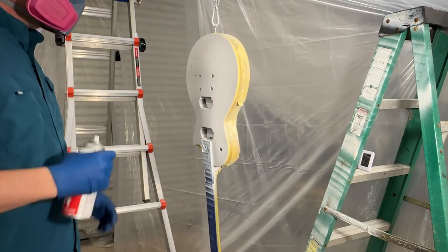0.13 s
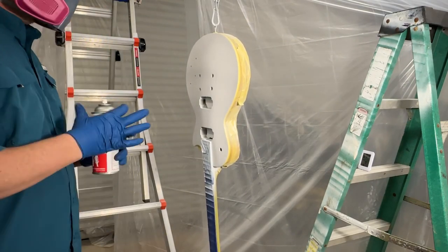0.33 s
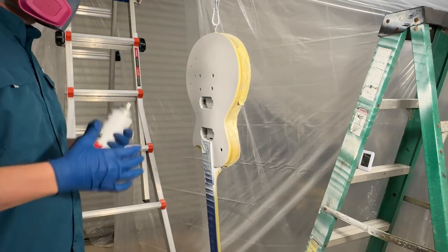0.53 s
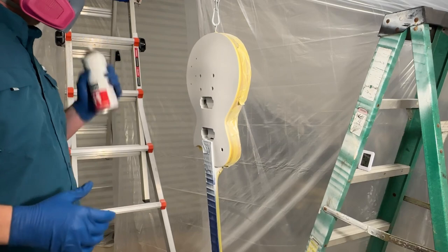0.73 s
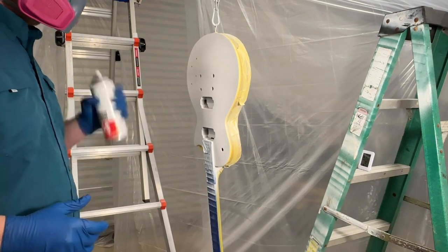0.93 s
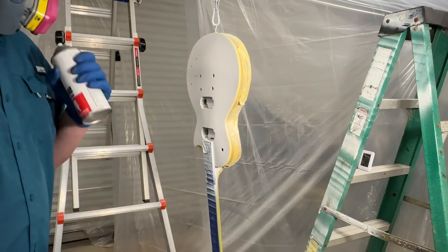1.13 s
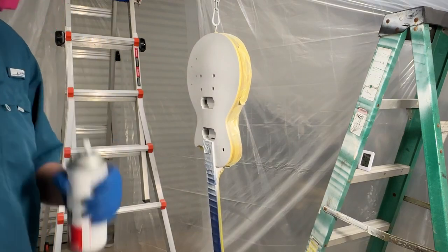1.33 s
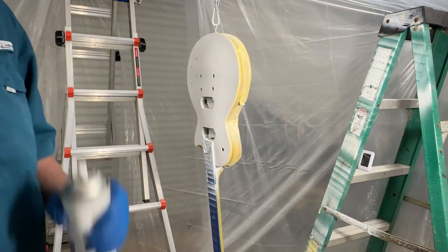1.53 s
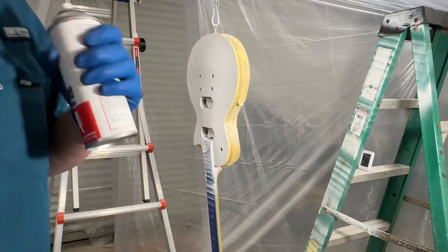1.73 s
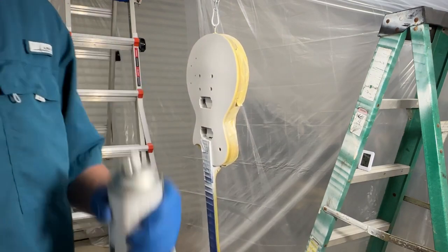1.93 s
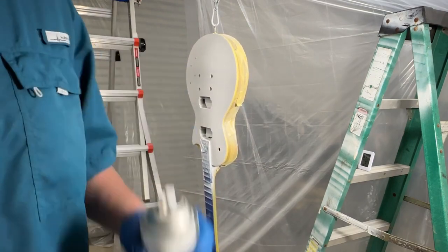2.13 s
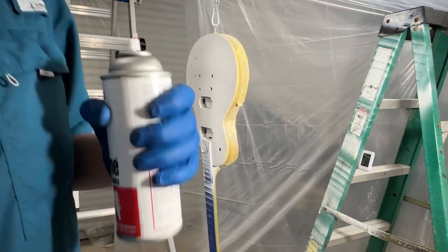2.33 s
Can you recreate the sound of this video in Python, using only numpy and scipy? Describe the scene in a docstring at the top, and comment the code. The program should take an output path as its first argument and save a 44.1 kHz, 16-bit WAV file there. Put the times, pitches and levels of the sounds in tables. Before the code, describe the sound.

Mixing ball clacks and chinks inside a hand-held spray can, faltering at first, then striking briskly about seven or eight times a second, growing louder and drier near the stereo microphone, over soft rumble and hiss.

```python
"""A small workshop: a gloved hand shakes a spray paint can, for the most part about three times a second.
At each turn of the stroke the mixing ball strikes one end and bounces: a shaped noise crack, filtered by
the steel. In between it taps the side wall and tumbles, and the paint swishes as dense random grains.
Hand and sleeve add soft brushes and one short low thump, as bands of noise. The room answers with echoes
and a decaying tail, which weaken as the can nears the microphone. A wavering low hum, rumble and hiss
lie beneath."""
import sys
import numpy as np
from scipy import signal
from scipy.fft import rfft, irfft
from scipy.io import wavfile
from scipy.ndimage import uniform_filter1d

SR = 44100
rng = np.random.default_rng(int(sys.argv[2]) if len(sys.argv) > 2 else 0)


def generate_wav(sig):
    """Save sig (samples, or channels by samples) to the path in sys.argv[1] as 16-bit PCM at SR."""
    pcm = np.round(np.clip(np.atleast_2d(sig).T, -1, 1) * 32767).astype(np.int16)
    wavfile.write(sys.argv[1], SR, pcm)


N = 109676

# Ball striking the ends. Each row: start in seconds, relative level in dB, place from 0 (clacking end)
# to 1 (chinking end), top fizz in dB, low knock in dB, most excited shell resonance in Hz.
END_STRIKES = [(-0.012, -0.5, 0.22, 6, 3.5, 5000), (0.1292, -7, 0.32, 7, 8.5, 1304),
               (0.1434, -9, 1, 0.5, -35, 5360), (0.1607, -11.5, 0.73, 2, 9, 4270),
               (0.523, -13.5, 0.62, 1.5, 6, 1590), (0.5359, -12, 0.23, 9, 12.5, 6300),
               (0.6402, -16.5, 1, 2, -1, 6360), (0.91, -2.5, 0.91, 6, 0.5, 4350),
               (0.913, 3, 0.9, -12, -33, 4800), (1.0469, -1, 0.73, 5, -5.5, 5000),
               (1.052, -6, 0.73, 5, 8.5, 5670), (1.2105, -3.5, 0.2, 7, 3.5, 2250),
               (1.216, 1.5, 0.55, -3, -35, 3780), (1.229, 2.5, 0.72, -24, -5.5, 4020),
               (1.3369, 0, 0.85, 4, -0.5, 5000), (1.348, -0.5, 0.55, 11, 7, 5350),
               (1.4978, 4, 0.41, -12.5, -0.5, 3930), (1.5308, 0, 0.4, -7, 4, 3780),
               (1.5634, -9, 0.24, 14, 5.5, 6750), (1.6506, -2.5, 0.79, 6.5, 9, 7000),
               (1.672, 0, 0.68, 2, 3, 6360), (1.7179, -1.5, 0.086, 10, 10, 8650),
               (1.7905, 2.5, 0.061, 14.5, 1, 3760), (1.8102, 1.5, 0.27, 11, -2.5, 4700),
               (1.8174, -3, 0.24, 16.5, 6, 3250), (1.9376, -4, 0.87, 9.5, 8, 1355),
               (1.9423, 3.5, 1.0, -2.5, 1, 1460), (2.062, 4, 0.24, -6, 2.5, 4000),
               (2.0773, 3, 0, 15, 10, 6600), (2.092, -3, 0.084, 20, 9, 3800),
               (2.1002, -5, 0.17, -33, 11.5, 3200), (2.228, -0.5, 0.79, 5, 6.5, 1620),
               (2.245, -0.5, 0.55, 3.5, 9.5, 6900), (2.3652, 3.5, 0.078, -1, -1, 4050),
               (2.3904, 1.5, 0.32, 14.5, 4.5, 2780)]
# Ball grazing the side wall. Each row: start in seconds, relative level in dB, added treble in dB.
WALL_TAPS = [(0.0226, 3, 10.5), (0.0581, 5, 1), (0.064, -4.5, 11), (0.2903, -12, 12.5),
             (0.3477, -13.5, 8.5), (0.755, 3.5, -1), (0.7907, 8, -6.5), (1.1469, 1.5, 4.5),
             (1.166, -15, 24.5), (1.264, 8, -11), (1.2921, 5, 2.5), (1.5148, 0.5, 16), (1.589, 7, 2.5),
             (1.7531, 3.5, -6), (1.8773, 2.5, 8), (2.0069, 8, -1.5), (2.021, 13.5, -4), (2.1138, 4, 8),
             (2.1699, 7, 2), (2.3076, 11.5, -0.5), (2.4797, 8.5, -6)]
# Spectrum of the two ends. Each row: frequency in Hz, clacking end in dB, chinking end in dB.
END_COLOUR = [(280, -28, -13), (430, -23, 2), (746, -12, -3.5), (1404, -1.5, 3), (1800, 2.5, 7.5),
              (2780, 12, 5), (4060, 16.5, 4.5), (5380, 2.5, 11.5), (6400, 8.5, 16), (8080, 9.5, 7.5),
              (9610, -13.5, 2), (11050, -28.5, -19), (12600, -8.5, 2), (15100, -13.5, 8.5),
              (16000, -53, -17)]
# Spectrum of the side wall. Each row: frequency in Hz, gain in dB.
WALL_COLOUR = [(200, -24.5), (700, -18.5), (1200, -11), (2800, -10.5), (8300, -14.5), (10500, -32.5),
               (15000, -24.5)]
# Level of the swishing paint. Each row: time in seconds, level in dB.
SWISH_LEVEL = [(0, -47), (.5, -67.5), (.85, -48), (1.35, -53.5), (1.65, -47), (2.15, -44.5), (2.33, -48),
               (2.48, -41)]
# Spectrum of the swishing paint. Each row: frequency in Hz, relative gain in dB.
SWISH_COLOUR = [(150, -9.5), (500, 1), (1200, 1.5), (2200, -3), (7200, -1), (10500, -43), (14500, -7.5)]
# Hand and sleeve: soft brushes and, second, one short low handling thump.
# Each row: middle in seconds, half length in seconds, centre in Hz, level in dB.
HANDLING = [(0.72, 0.1, 550, -57), (1.616, 0.008, 207, -41), (1.893, 0.041, 400, -51.5)]
# The can is to the left. Each row: frequency in Hz, dB added on the left and taken from the right.
LEFTWARD = [(500, 2), (3000, 1.15), (7500, 2.5), (13000, -0.5)]
# The can comes nearer. Each row: time in seconds, level sent to the room in dB.
ROOM_SEND = [(0, -3.5), (1, -6.5), (2.4, -15.5)]
# Decay of the workshop. Each row: frequency in Hz, time to fall 60 dB in seconds, relative level in dB.
ROOM_DECAY = [(300, 0.12, 2.5), (1870, 0.53, 4), (5900, 0.39, 0), (7900, 0.73, -5), (11700, 0.23, 0.5),
              (14200, 0.23, 6)]
# Level of the hum. Each row: time in seconds, level in dB.
HUM_LEVEL = [(0, -47), (.7, -47.5), (1.05, -45.5), (1.25, -71), (1.45, -47), (1.68, -34.5), (1.85, -58),
             (2.45, -50)]
# Spectrum of the workshop's rumble and hiss. Each row: frequency in Hz, relative gain in dB.
FLOOR_COLOUR = [(30, -29), (46, -4), (65, 2), (105, -7), (140, -16), (220, -23.5), (1500, -40.5),
                (3200, -49.5), (6000, -35.5), (11000, -66), (15000, -55)]

# the contact: rise, crack decay and ring decay; ring level relative to the crack
RISE_S, CRACK_S, RING_S, RING_DB = .001, 0.00033, 0.0025, -12
# the ball skids and touches the steel again just after each contact, at 0.5 to 1.5 times this delay
RETOUCH_DB, RETOUCH_S = -7, .0008
ROUGH_ABOVE_HZ = 2400  # lower down the contact acts as one clean push
GRAIN_DB = 1.19  # rms unevenness of each spectrum
LEFT_LEAD_S = 0.0002
APART = 0.73  # independent noise on each side, relative to the shared noise
# shell resonance: lift at the tap pitch, sharpness, and how fast the lift falls with pitch
SHELL_DB, SHELL_Q, SHELL_TILT = 12.5, 5.7, 0.39
TAP_RING_HZ, TAP_RISE_HZ_PER_S = 937, 160
ROLL_OVER_SWISH_DB = 48.5
SWISH_GRAINS_PER_S, SWISH_SPREAD_DB = 1200, 3.5
TAP_ROOM_DB = -3.5  # soft knocks sent to the room, relative to strikes
EARLY_DB, EARLY_S, EARLY_PER_S = 2.5, 0.011, 1000  # early echoes: level against the tail, decay, density
HUM_HZ, HUM_WAVER_HZ, HUM_WAVER = 63.4, 9.6, .6  # pitch, bandwidth and depth of the waver
FLOOR_DB = -47
EDGE_HZ = 16500  # upper limit of the recorder
LEAD_IN = SR // 10  # samples ahead of time zero

# frequency and time axes of one impact
SIZE = 4096
HZ, T = np.fft.rfftfreq(SIZE, 1 / SR), np.arange(SIZE) / SR


def strikes(fizz_hz=9000, knock_hz=1850):
    """Collision with an end plate: the place of contact sets the blend of the two ends' spectra."""
    out = np.zeros((2, LEAD_IN + N))
    fizz = 1 / (1 + (fizz_hz / (HZ + 1)) ** 6)
    knock = 1 / (1 + (HZ / knock_hz) ** 10)
    for s, db, place, fizz_db, knock_db, ring_hz in END_STRIKES:
        end = (1 - place) * read(END_COLOUR, HZ, axis=1) + place * read(END_COLOUR, HZ, axis=2)
        add(out, s, impact(db + end + fizz_db * fizz + knock_db * knock + shell(ring_hz)))
    return out


def impact(colour_db):
    """Impulsive excitation: a brief crack of thin, hand-damped steel and a short ring, left side first."""
    shared, left, right = rng.standard_normal((3, SIZE))
    after = np.maximum(T - RISE_S, 0)
    decay = np.exp(-after / CRACK_S) + amp(RING_DB) * np.exp(-after / RING_S)
    shape = np.minimum(T / RISE_S, 1) * decay
    crack = rfft(shape * (shared + APART * np.array([left, right])))
    # flatten the spectrum, so that the colour alone sets the balance
    crack /= np.sqrt(uniform_filter1d(abs(crack) ** 2, size=90, axis=1))
    # a delayed second contact combs the spectrum
    retouch = amp(RETOUCH_DB) * np.exp(-2j * np.pi * HZ * RETOUCH_S * (.5 + rng.random()))
    rough = 1 / (1 + (ROUGH_ABOVE_HZ / (HZ + 1)) ** 6)
    push = np.exp(-2j * np.pi * HZ * RISE_S)
    crack = np.sqrt(rough) * crack * unit(1 + retouch) + np.sqrt(1 - rough) * push
    grain = GRAIN_DB * unit(uniform_filter1d(rng.standard_normal(len(HZ)), size=60))
    sound = crack * causal(colour_db + grain)
    sound[1] *= np.exp(-2j * np.pi * HZ * LEFT_LEAD_S)  # the right side lags
    return irfft(sound)


def causal(db):
    """Minimum phase: the log gain and the phase form a Hilbert pair."""
    log_gain = np.log(amp(np.r_[db, db[-2:0:-1]]))
    return np.exp(np.conj(signal.hilbert(log_gain)))[:len(db)]


def shell(ring_hz):
    """Resonance in dB favoured by the spot of contact; low resonances stand out more."""
    peak_db = SHELL_DB * (TAP_RING_HZ / ring_hz) ** SHELL_TILT
    return peak_db / (1 + (2 * SHELL_Q * (HZ / ring_hz - 1)) ** 2)


def taps(treble_hz=2000, scatter_octaves=0.63):
    """Grazing contact: side-wall taps excite a scattered shell resonance that slowly rises in pitch."""
    out = np.zeros((2, LEAD_IN + N))
    treble = 1 / (1 + (treble_hz / (HZ + 1)) ** 4)
    for (s, db, treble_db), chance in zip(WALL_TAPS, rng.random(len(WALL_TAPS))):
        ring_hz = (TAP_RING_HZ + TAP_RISE_HZ_PER_S * s) * 2 ** (scatter_octaves * (chance - .5))
        add(out, s, impact(db + read(WALL_COLOUR, HZ) + treble_db * treble + shell(ring_hz)))
    return out


def rolling(spread_db=6, octaves=3.0, count=110):
    """Repeated weak impacts: the ball tumbles through the paint with small knocks of varied pitch."""
    out = np.zeros((2, LEAD_IN + N))
    for k, (when, size, pitch) in enumerate(rng.random((count, 3))):
        s = (k + when) / count * N / SR  # one knock at random within each equal slot
        db = np.interp(s, *np.transpose(SWISH_LEVEL)) + ROLL_OVER_SWISH_DB - 2 * spread_db * size
        ring_hz = (TAP_RING_HZ + TAP_RISE_HZ_PER_S * s) * 2 ** (pitch - .5)
        dull = -10 * np.log10(1 + (np.log2((HZ + 1) / ring_hz) / octaves) ** 4)
        add(out, s, impact(db + read(WALL_COLOUR, HZ) + dull + shell(ring_hz)))
    return out


def swish():
    """Granular noise: dense random grains of moving paint and sleeve merge into a swish of varying level."""
    sizes = amp(SWISH_SPREAD_DB * np.minimum(rng.exponential(1, (3, N)), 5))
    present = rng.random((3, N)) < SWISH_GRAINS_PER_S / SR
    grains = sizes * rng.standard_normal((3, N)) * present
    level = amp(np.interp(np.arange(N) / SR, *np.transpose(SWISH_LEVEL)))
    # the third stream is common to both sides
    return level * coloured(grains[:2] + .5 * grains[2], SWISH_COLOUR)


def handling(octaves=0.82):
    """Band-limited noise under bell-shaped envelopes: soft brushes and one short low handling thump."""
    t, hz = np.arange(N) / SR, np.fft.rfftfreq(N, 1 / SR) + 1
    out = np.zeros((2, N))
    for s, half, centre_hz, db in HANDLING:
        noise = rng.standard_normal(N) + APART * rng.standard_normal((2, N))
        band = irfft(rfft(noise) * np.exp(-(np.log2(hz / centre_hz) / octaves) ** 2), N)
        out += amp(db) * np.exp(-((t - s) / half) ** 2) * unit(band)
    return out


def to_the_left(x):
    """Interaural level difference: the balance between the sides depends on frequency."""
    db = read(LEFTWARD, np.fft.rfftfreq(N, 1 / SR))
    return irfft(rfft(x) * amp([db, -db]), N)


def workshop(x, count=4):
    """Reverberation by convolution: several room responses take turns, as the can moves about."""
    t = (np.arange(x.shape[1]) - LEAD_IN) / SR
    sent = x[0] * amp(np.interp(t, *np.transpose(ROOM_SEND)))
    zone = np.floor(t * 10) % count  # a new response each tenth of a second
    wet = sum(signal.fftconvolve((sent * (zone == k))[None], room_tail(), axes=1) for k in range(count))
    return wet[:, :len(t)]


def room_tail(onset_s=0.0028):
    """Impulse response: sparse early reflections and a diffuse tail, each band dying at its own rate."""
    t = np.arange(SR // 2) / SR
    hz, at, z = signal.stft(rng.standard_normal((2, len(t))), SR, nperseg=256)
    decay = np.exp(-np.log(1000) * at / read(ROOM_DECAY, hz)[:, None])
    z = z * decay * amp(read(ROOM_DECAY, hz, axis=2))[:, None]
    tail = signal.istft(z, SR, nperseg=256)[1][:, :len(t)] * np.minimum(t / onset_s, 1) ** 2
    signs = np.sign(rng.standard_normal(tail.shape))
    echoes = signs * (rng.random(tail.shape) < EARLY_PER_S / SR)
    early = echoes * np.exp(-t / EARLY_S) * (t > .0015)
    return (unit(tail) + amp(EARLY_DB) * unit(early)) / np.sqrt(len(t))


def background(mono_hz=700):
    """Random modulation of a low tone makes a wavering hum; rumble and hiss are noise, bass alike both sides."""
    t, hz = np.arange(N) / SR, np.fft.rfftfreq(N, 1 / SR)
    mid, side = rng.standard_normal((2, N))
    side = irfft(rfft(side) * hz / np.hypot(hz, mono_hz), N)
    waver = unit(irfft(rfft(rng.standard_normal((2, N))) / (1 + (hz / HUM_WAVER_HZ) ** 2), N))
    turn = 2 * np.pi * HUM_HZ * t
    hum = unit((1 + HUM_WAVER * waver[0]) * np.sin(turn) + HUM_WAVER * waver[1] * np.cos(turn))
    hum *= amp(np.interp(t, *np.transpose(HUM_LEVEL)))
    floor = amp(FLOOR_DB) * coloured(np.array([mid + side, mid - side]), FLOOR_COLOUR)
    return floor + hum


def amp(db):
    """The decibel: twenty times the logarithm of an amplitude ratio, here inverted to gain."""
    return 10 ** (np.asarray(db) / 20)


def unit(x):
    """Normalization to a root-mean-square of 1."""
    return x / np.sqrt(np.mean(abs(x) ** 2) + 1e-20)


def read(table, hz, axis=1):
    """Interpolation of one table column along a logarithmic frequency axis."""
    table = np.array(table)
    return np.interp(np.log(hz + 1), np.log(table[:, 0]), table[:, axis])


def add(mix, s, sound):
    """Superposition: adds a stereo sound to the mix at time s."""
    part = mix[:, LEAD_IN + round(s * SR):][:, :sound.shape[1]]
    part += sound[:, :part.shape[1]]


def coloured(x, table):
    """Spectral shaping: weights a full-length signal by frequency, at rms 1."""
    return unit(irfft(rfft(x) * amp(read(table, np.fft.rfftfreq(N, 1 / SR))), N))


def scene():
    """Superposition of direct can and hand sounds, room and background; soft knocks reach the room weaker."""
    hard = strikes()
    soft = taps() + rolling()
    room = workshop(hard + amp(TAP_ROOM_DB) * soft)[:, LEAD_IN:]
    direct = (hard + soft)[:, LEAD_IN:] + swish() + handling()
    return to_the_left(direct) + room + background()


def record(dry):
    """Saturation and band limiting: the recorder rounds off the highest peaks, then cuts the extreme top."""
    rounded = np.tanh(dry)
    low_pass = signal.firwin(255, EDGE_HZ, window=("kaiser", 9), fs=SR)
    return signal.oaconvolve(rounded, low_pass[None], "same")


dry = scene()
out = record(dry)
generate_wav(out)
```